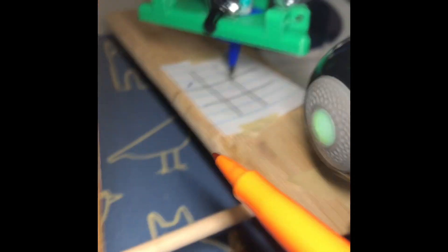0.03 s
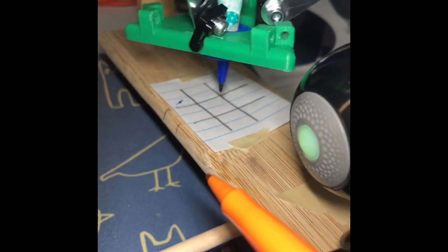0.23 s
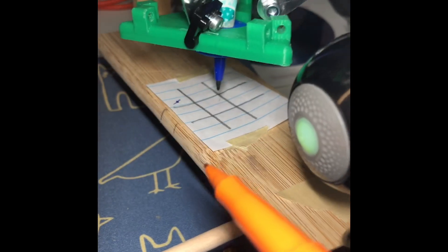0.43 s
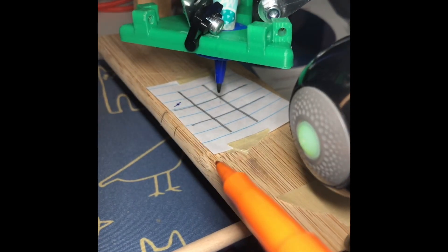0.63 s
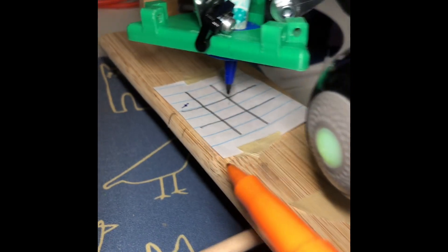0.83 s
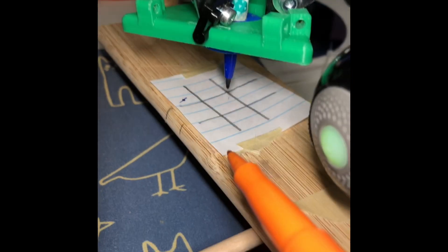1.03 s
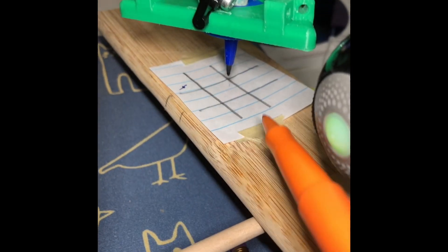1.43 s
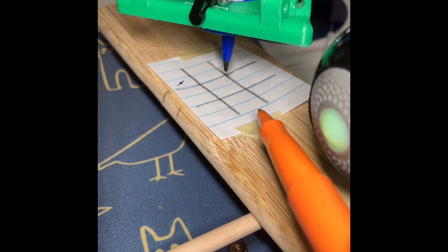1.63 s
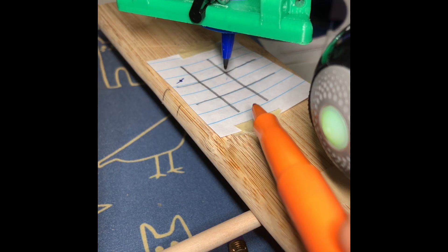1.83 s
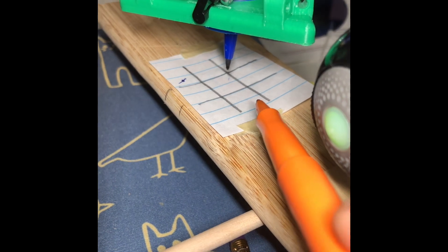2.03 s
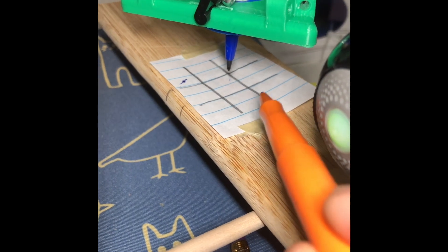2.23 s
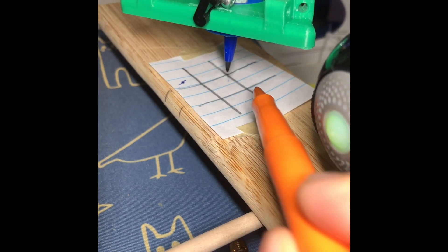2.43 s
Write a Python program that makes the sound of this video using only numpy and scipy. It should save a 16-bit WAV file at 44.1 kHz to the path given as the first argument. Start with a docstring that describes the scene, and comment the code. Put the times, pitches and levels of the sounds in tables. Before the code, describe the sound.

A marker being uncapped up close: a hollow snap, short rubbing pulls and light clicks.

```python
"""A plastic marker is handled close to the microphone in a quiet room.
Fingers brush and thump, then the cap snaps loose with a hollow pop. It slides along the barrel in two
pulls, tiny slips sounding its hollow, while the grip rumbles and the plastic ticks.
The cap rasps off the rim with a softer snap. Later a few soft bumps sound a wooden board."""
import sys
import numpy as np
from scipy import signal
from scipy.fft import rfft, irfft
from scipy.io import wavfile
from scipy.ndimage import uniform_filter1d

SR = 44100
rng = np.random.default_rng(int(sys.argv[2]) if len(sys.argv) > 2 else 0)


def output_pcm(signal):
    """Save a mono or channel-first signal as 16-bit PCM at the path in sys.argv[1].

    Samples are clipped to [-1, 1] before scaling.
    """
    pcm = np.clip(np.atleast_2d(signal).T, -1, 1) * 32767
    wavfile.write(sys.argv[1], SR, np.round(pcm).astype(np.int16))


N = 110250


def from_db(db):
    """Decibels to gain."""
    return 10 ** (np.asarray(db) / 20)


def rms_one(x):
    """Scale to unit rms."""
    return x / np.sqrt(np.mean(x ** 2) + 1e-20)


def since(s):
    """Seconds since a moment, zero before it."""
    return np.maximum(np.arange(N) / SR - s, 0)


def level(rows):
    """Gain along a (time_s, level_db) curve, silent outside it."""
    s, db = np.transpose(rows)
    return from_db(np.interp(since(0), s, db, left=-200, right=-200))


def swell(t, peak_s):
    """Rises to one at peak_s and dies away."""
    return t / peak_s * np.exp(1 - t / peak_s)


def hump(peak_s, width_s, db):
    """A bell-shaped rise and fall of gain."""
    return from_db(db) * np.exp(-.5 * ((since(0) - peak_s) / width_s) ** 2)


def coloured(x, points):
    """EQ a steady signal along a (freq_hz, gain_db) curve; rms 1."""
    hz, db = np.transpose(points)
    f = np.maximum(np.fft.rfftfreq(N, 1 / SR), 1)
    gain = from_db(np.interp(np.log(f), np.log(hz), db))
    return rms_one(irfft(rfft(x) * gain, N))


def noise(points):
    """Smooth noise of a given spectrum."""
    return coloured(rng.standard_normal(N), points)


def resonance(x, hz, width_hz, order=1):
    """A band that rings; order 2 has steeper sides."""
    edges = [max(hz - width_hz / 2, 10), hz + width_hz / 2]
    return signal.sosfilt(signal.butter(order, edges, "band", fs=SR, output="sos"), x + 1e-18)


def noise_band(hz, width_hz, order=2):
    """Noise that wavers around one pitch."""
    return resonance(rng.standard_normal(N), hz, width_hz, order)


def evened(x, span_s):
    """Hold the level steady, ready for an envelope to shape it."""
    power = uniform_filter1d(np.abs(signal.hilbert(x)) ** 2 / 2, max(int(span_s * SR), 1))
    return x / np.sqrt(np.maximum(power, 0) + 1e-18)


def damped(t, hz, db, t60):
    """One struck mode."""
    return from_db(db - 60 * np.minimum(t / t60, 5)) * np.sin(2 * np.pi * hz * t)


def room_tone():
    """Steady hiss and rumble with a low wavering hum."""
    # tone of the quiet room: freq_hz, gain_db
    room_colour = [(20, -42), (35, -9.5), (55, -3.5), (80, 0.5), (115, 2.5), (190, -3), (300, -6),
                   (500, -9.5), (1000, -16.5), (2000, -21.5), (4000, -24.5), (8000, -27), (15500, -31.5)]
    hum = rms_one(noise_band(hz=55.8, width_hz=4.6))
    return from_db(-68.5) * noise(room_colour) + from_db(-78) * hum


def brushes():
    """Short soft hisses of skin on plastic, then one thin airy swish."""
    # finger strokes: peak_s, width_s, level_db
    strokes = [(0.066, 0.014, -65.5), (0.137, 0.028, -73), (0.272, 0.044, -68.5), (0.315, 0.007, -65.5),
               (0.386, 0.052, -71.5)]
    # tone of skin on plastic: freq_hz, gain_db
    skin_colour = [(300, 3), (1800, 4.5), (4000, -2.5), (8000, -6.5), (15500, -8)]
    air = rms_one(noise_band(hz=12800, width_hz=12800, order=1))
    swish = air * hump(peak_s=0.545, width_s=0.025, db=-74.5)
    return noise(skin_colour) * sum(hump(*stroke) for stroke in strokes) + swish


def thumps():
    """Dull knocks of the hand, diving in pitch, with the deepest lows trimmed."""
    # handling knocks: start_s, level_db
    knocks = [(0.0588, -48.5), (0.1193, -62.5), (0.2405, -39.5), (0.3061, -42), (0.397, -48.5),
              (1.0175, -58.5)]
    start_hz, end_hz, fall_s, low_cut_hz = 367, 48, 0.0051, 45.6
    out = np.zeros(N)
    for s, db in knocks:
        t = since(s)
        turns = end_hz * t + (start_hz - end_hz) * fall_s * (1 - np.exp(-t / fall_s))
        out += from_db(db) * swell(t, peak_s=0.0045) * np.sin(2 * np.pi * turns)
    return signal.sosfilt(signal.butter(2, low_cut_hz, "high", fs=SR, output="sos"), out)


def snaps():
    """The cap jumps its catch: a sharp crack, the ring of the plastic and the pop of the hollow."""
    # snaps over the catch: start_s, level_db, pop_db
    hits = [(0.2348, -29.5, -22), (0.9131, -44.5, -54.5)]
    # tone of the crack: freq_hz, gain_db
    crack_colour = [(60, -32), (400, 12), (2000, -1), (2800, -0.5), (4300, 0), (6000, -15.5), (7800, -4),
                    (10000, -14), (12200, -20), (15500, -49), (20000, -60)]
    # modes of the plastic, one list each: pitch_hz, level_db, t60_s
    pitch_hz = [900, 1350, 1990, 2250, 3090, 4470, 5500, 7608, 8257, 9280, 12080]
    level_db = [1.5, -8.5, -2, -13, -17, -5, -5.5, -19, -25, -23, -28]
    t60_s = [0.013, 0.024, 0.011, 0.014, 0.021, .007, 0.0045, .05, 0.026, 0.03, 0.028]
    rise_s, crack_decay_s = 0.00005, 0.00081
    out = np.zeros(N)
    for s, db, pop_db in hits:
        t = since(s)
        modes = zip(pitch_hz, level_db, t60_s)
        ring = sum((-1) ** k * damped(t, *mode) for k, mode in enumerate(modes))
        crack = from_db(1.5) * evened(noise(crack_colour), 0.003) * np.exp(-t / crack_decay_s)
        attack = 1 - np.exp(-t / rise_s)
        out += from_db(db) * (ring + crack) * attack + pop(s, pop_db)
    return out


def pop(s, db, lag_s=0.0011):
    """A blow sounds the hollow of the cap for a few cycles."""
    click = np.zeros(N)
    click[int((s + lag_s) * SR)] = 1
    ring = resonance(click, hz=534, width_hz=157, order=2)
    return from_db(db) * ring / np.abs(ring).max()


def room_tail(x, wet_db=-28, t60_s=0.37):
    """The faint diffuse reverb of a small room."""
    tail = rng.standard_normal(N) * np.exp(-np.log(1000) * since(0) / t60_s)
    return from_db(wet_db) * signal.fftconvolve(x, tail / np.sqrt(np.sum(tail ** 2)))[:N]


def slips(per_s, spread_db=2):
    """Tiny stick-slip clicks of uneven size at random moments."""
    sizes = from_db(spread_db * np.minimum(rng.exponential(1, N), 4)) * rng.choice([-1, 1], N)
    return sizes * (rng.random(N) < per_s / SR)


def pull(friction, hollow_hz, width_hz, rub_db, ring_db):
    """The sliding cap: dense slips sound the hollow, the walls and their high ring."""
    # tone of the rubbing walls: freq_hz, gain_db
    rub_colour = [(30, -60), (150, -8), (300, -3.5), (500, 6), (850, -5.5), (1250, -11), (2000, -17),
                  (3500, -22), (6000, -25.5), (10000, -36.5), (15500, -39)]
    # thin ring of the barrel: pitch_hz, level_db, width_hz
    barrel_modes = [(5800, -9, 500), (7690, 0, 80), (9600, -2, 250), (12500, -10, 500)]
    drive = slips(per_s=2500)
    hollow = evened(resonance(drive, hollow_hz, width_hz, order=2), 0.01)
    walls = evened(coloured(slips(per_s=2500), rub_colour), 0.016)
    ring = sum(from_db(db) * rms_one(resonance(drive, hz, width)) for hz, db, width in barrel_modes)
    force = level(friction)
    rub_gain = (force / from_db(-51)) ** 0.54  # swings about half as many dB as the hollow
    return force * hollow + rub_gain * (from_db(rub_db) * walls + from_db(ring_db) * ring)


def pulls():
    """Two pulls on the cap, the second louder and higher."""
    # friction envelope of each pull: time_s, level_db
    first_friction = [(0.24, -61), (0.278, -52.5), (0.295, -62), (0.315, -54), (0.345, -68), (0.41, -56),
                      (0.45, -55.5), (0.459, -45), (0.476, -44), (0.495, -54), (0.51, -69), (0.56, -95)]
    second_friction = [(0.70, -83), (0.755, -58), (0.78, -60), (0.792, -47.5), (0.815, -53), (0.85, -45),
                       (0.868, -33), (0.885, -46.5), (0.903, -42.5), (0.925, -66), (0.99, -116)]
    first = pull(first_friction, hollow_hz=493, width_hz=149, rub_db=-63, ring_db=-93)
    second = pull(second_friction, hollow_hz=598, width_hz=127, rub_db=-58.5, ring_db=-81.5)
    return first + second


def rumbles():
    """Low rubbing of the shifting grip."""
    # shifts of the hand: peak_s, width_s, level_db, pitch_hz
    shifts = [(0.366, 0.013, -56.5, 214), (0.458, 0.02, -56, 270), (0.495, 0.018, -65.5, 85),
              (0.80, 0.021, -58, 129), (0.811, 0.018, -55, 376), (0.935, 0.019, -61, 138),
              (0.938, 0.02, -61, 292), (1.048, 0.015, -58, 96), (1.155, 0.011, -65.5, 282),
              (2.26, 0.013, -61, 110), (2.42, 0.019, -65.5, 112)]
    return sum(hump(s, width_s, db) * evened(noise_band(hz, width_hz=0.59 * hz), 0.027)
               for s, width_s, db, hz in shifts)


def ticks(decay_s=0.002):
    """Brief crunchy contacts of plastic on plastic, each with a short ring and a hollow pop."""
    # light contacts: start_s, level_db, pop_db
    contacts = [(0.598, -66, -68), (0.8728, -49, -57), (0.8742, -49, -43), (0.8959, -43, -68),
                (0.9005, -44.5, -41), (0.9065, -43, -43.5), (0.9487, -53.5, -66), (1.0071, -48, -53),
                (1.0098, -58, -46), (1.1503, -57, -76), (1.573, -64, -80)]
    # tone of the crunch: freq_hz, gain_db
    grit_colour = [(60, -35), (500, 0), (1200, 4), (1800, -4.5), (2450, 2.5), (3200, 0.5), (3900, -9),
                   (5000, -8), (6500, -14.5), (9500, -17), (15500, -34), (20000, -47)]
    # ring of a tick: pitch_hz, level_db, t60_s
    modes = [(2370, -5, 0.017), (3170, -13, .012), (4900, -6.5, .008)]
    out, grit = np.zeros(N), evened(noise(grit_colour), 0.00095)
    for s, db, pop_db in contacts:
        t = since(s)
        crunch = grit * (t > 0) * np.exp(-t / decay_s)
        ring = sum(damped(t, *mode) for mode in modes)
        out += from_db(db) * (crunch + ring) + pop(s, pop_db)
    return out


def rasp():
    """Bright grains as the rim of the cap scrapes off the barrel."""
    # envelope of the scrape: time_s, level_db
    scrape = [(0.845, -70), (0.872, -53), (0.892, -47.5), (0.901, -43.5), (0.914, -49.5), (0.922, -56),
              (0.945, -66), (1.0, -77)]
    # tone of the rim: freq_hz, gain_db
    rim_colour = [(40, -45), (200, -26), (800, -5), (1100, -7.5), (1490, 3.5), (2200, -11), (3150, -5),
                  (3900, -15), (4800, -11.5), (7700, -19), (11200, -28), (15500, -24)]
    return level(scrape) * evened(coloured(slips(per_s=1800), rim_colour), 0.008)


def bumps():
    """Each bump starts with a scuff while the board's ring builds up and dies."""
    # soft bumps on the board: start_s, rise_s, decay_s, level_db, relative_scuff_db
    hits = [(1.348, 0.029, 0.028, -47, -11.5), (2.147, 0.045, 0.026, -52, -7),
            (2.295, 0.045, 0.016, -49, -10.5), (2.475, 0.021, .025, -59, -4.5)]
    # modes of the wood: pitch_hz, relative_db, width_hz
    board_modes = [(91, -8.5, 11), (193.1, 4.5, 18), (270.6, -8.5, 17), (377, -15, 25), (462.3, -7.5, 16.4)]
    # tone of the scuff: freq_hz, gain_db
    scuff_colour = [(25, -37), (80, -4), (220, 2), (480, -2.5), (680, -12.5), (1150, -15), (1700, -29),
                    (5000, -33.5), (15500, -52)]
    bands = [from_db(db) * evened(noise_band(hz, width), 0.012) for hz, db, width in board_modes]
    board = rms_one(sum(bands))
    out, friction = np.zeros(N), evened(noise(scuff_colour), 0.025)
    for s, rise_s, decay_s, db, scuff_db in hits:
        t = since(s)
        ring = board * np.minimum(t / rise_s, 1) ** 2 * np.exp(-since(s + rise_s) / decay_s)
        scuff = from_db(scuff_db) * swell(t, peak_s=0.019) * friction
        out += from_db(db) * (ring + scuff)
    return out


def scene():
    """The marker with a touch of reverb, the hand and the board over room tone, in mono."""
    marker = snaps() + ticks() + pulls() + rasp()
    return (marker + room_tail(marker) + thumps() + rumbles() + brushes() + bumps() + room_tone())[None]


def record(dry):
    """The top is cut steeply."""
    cutoff_hz = 15820
    return signal.sosfilt(signal.ellip(12, .1, 80, cutoff_hz, fs=SR, output="sos"), dry)


dry = scene()
out = record(dry)
output_pcm(out)
```